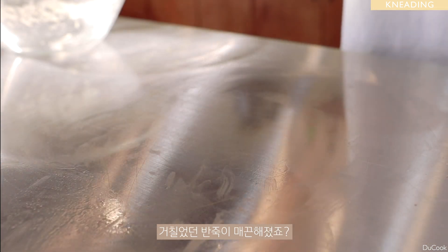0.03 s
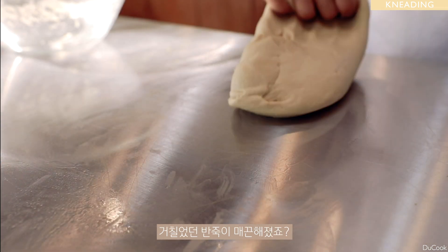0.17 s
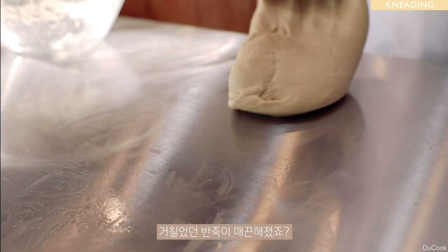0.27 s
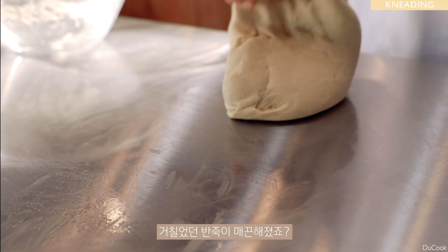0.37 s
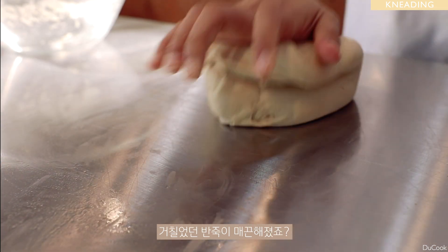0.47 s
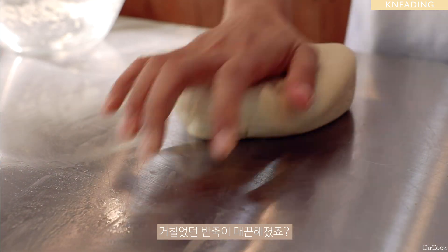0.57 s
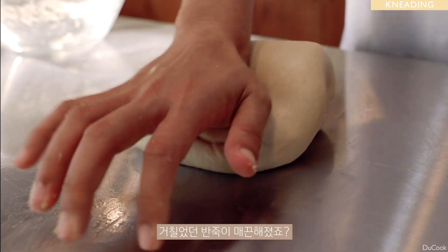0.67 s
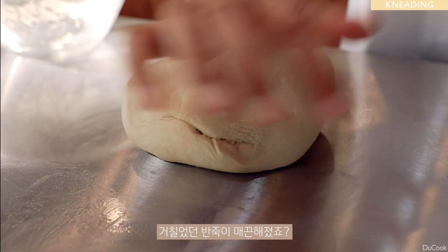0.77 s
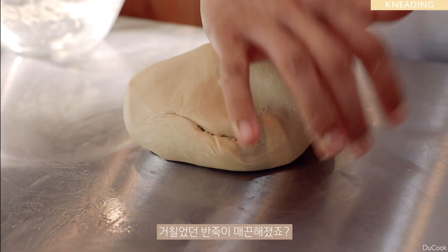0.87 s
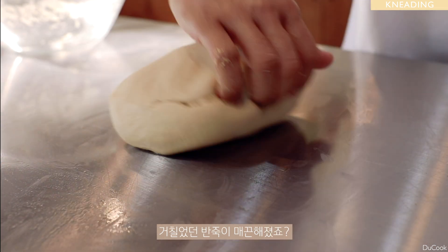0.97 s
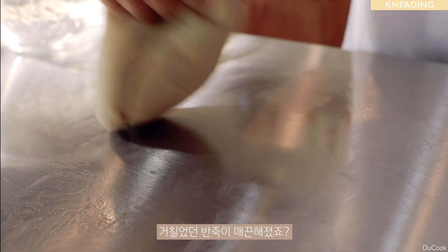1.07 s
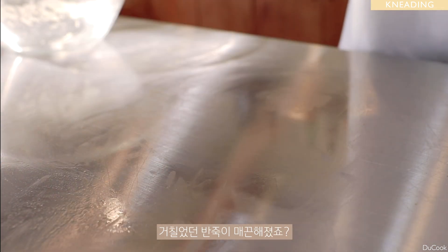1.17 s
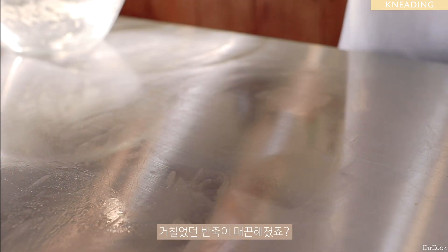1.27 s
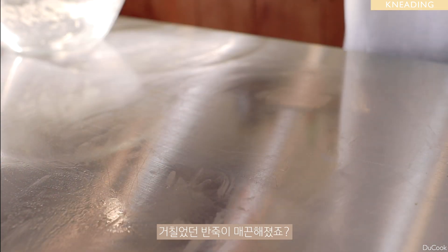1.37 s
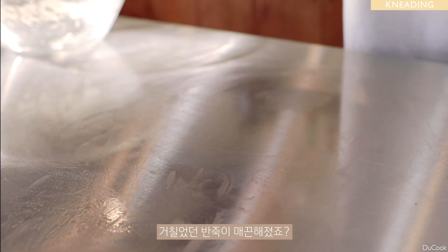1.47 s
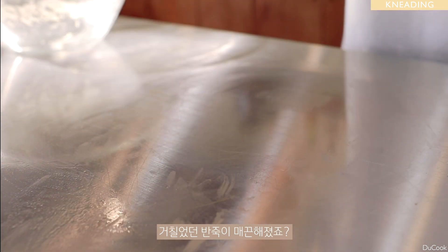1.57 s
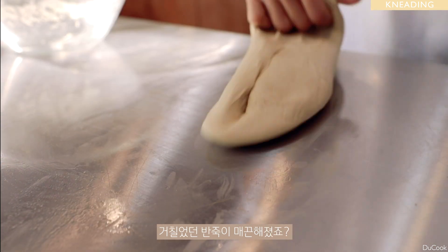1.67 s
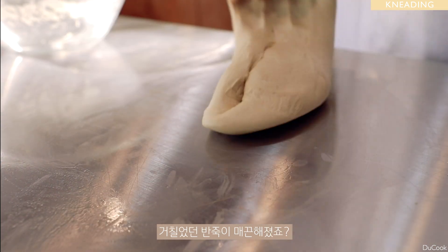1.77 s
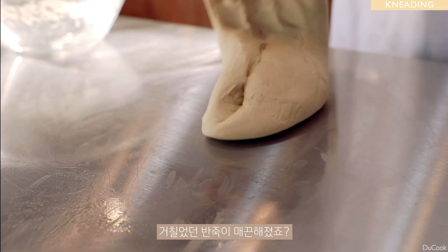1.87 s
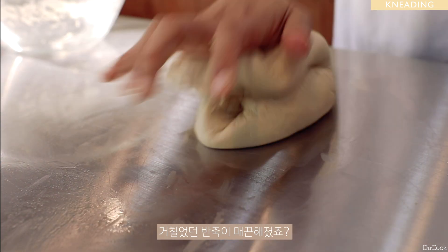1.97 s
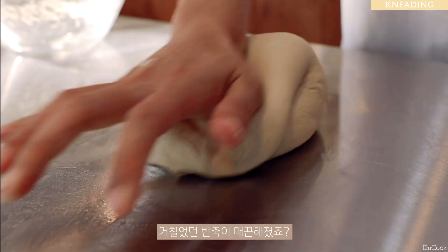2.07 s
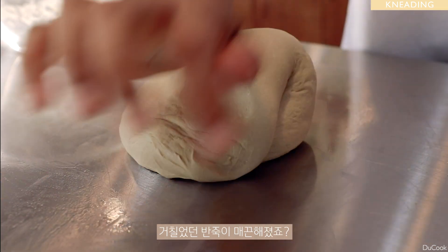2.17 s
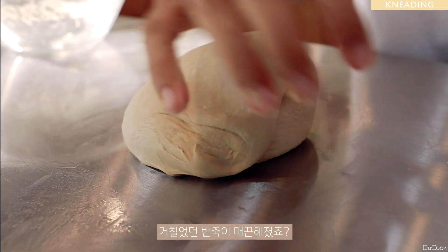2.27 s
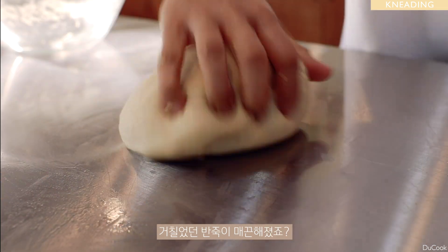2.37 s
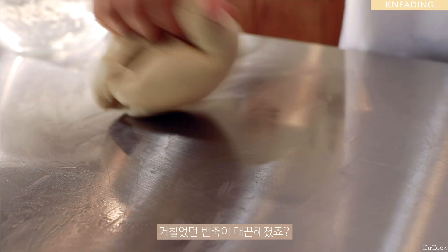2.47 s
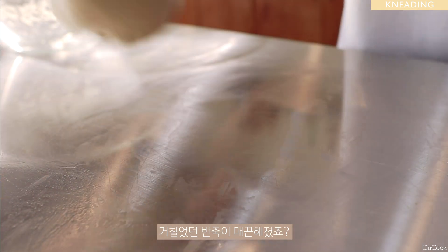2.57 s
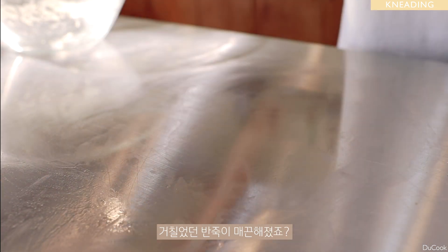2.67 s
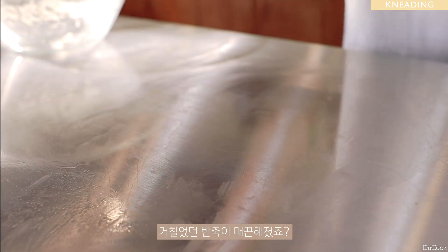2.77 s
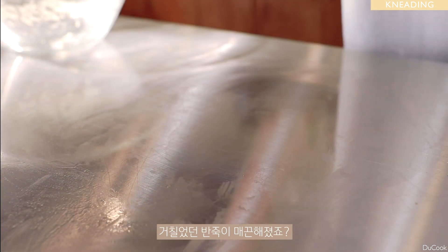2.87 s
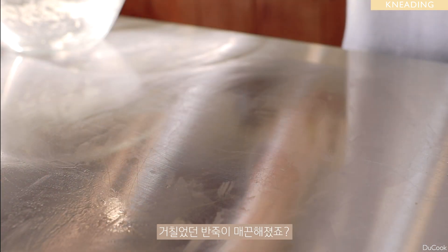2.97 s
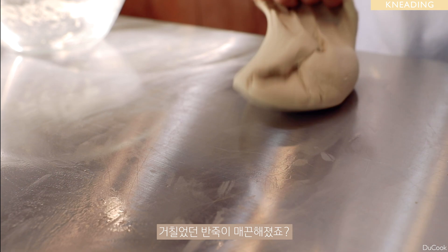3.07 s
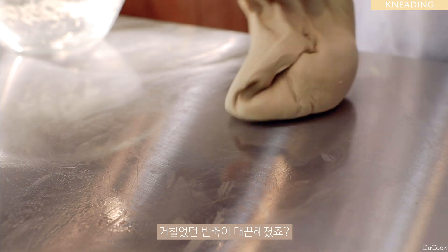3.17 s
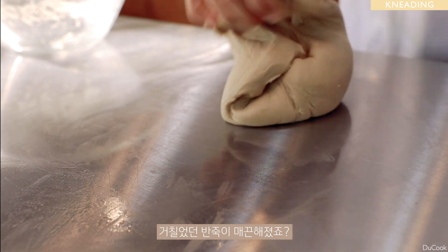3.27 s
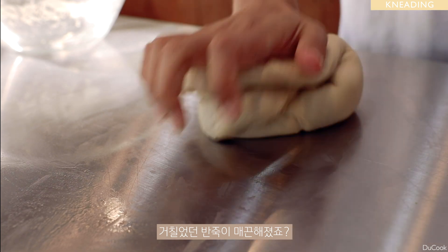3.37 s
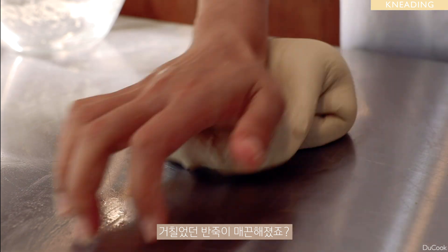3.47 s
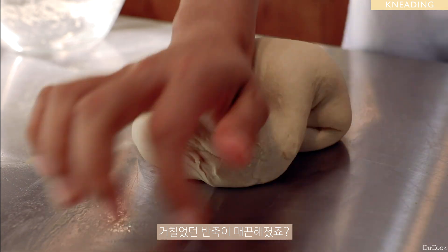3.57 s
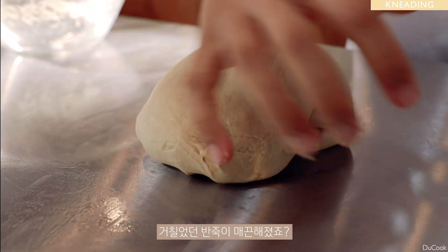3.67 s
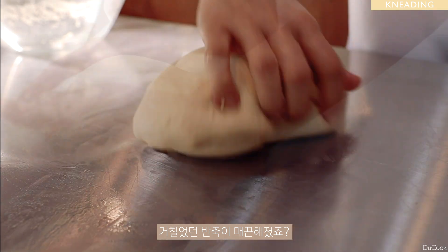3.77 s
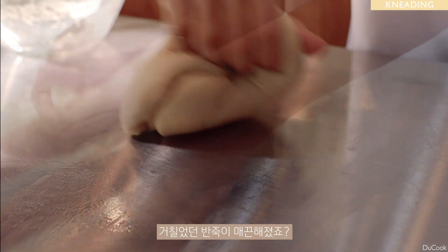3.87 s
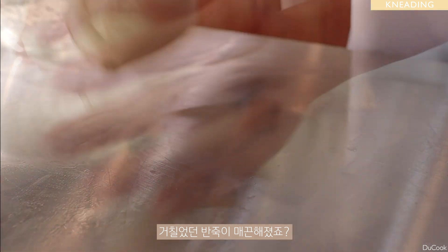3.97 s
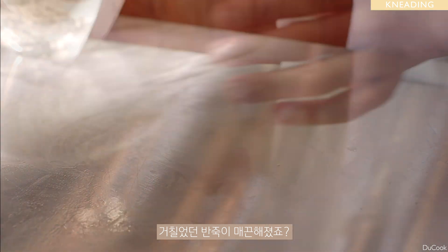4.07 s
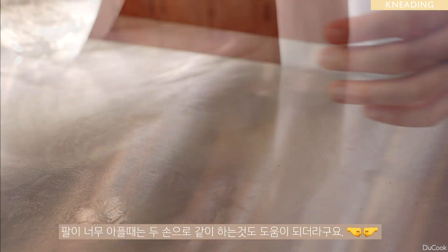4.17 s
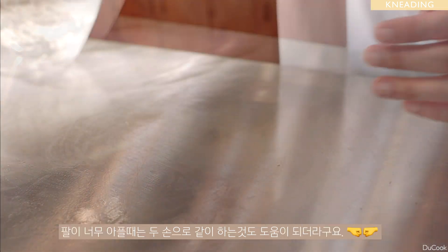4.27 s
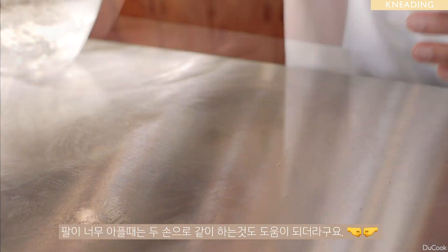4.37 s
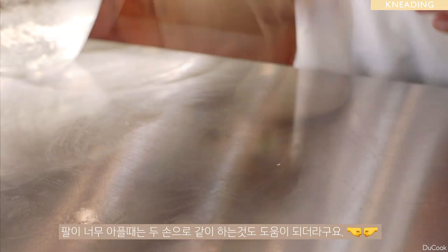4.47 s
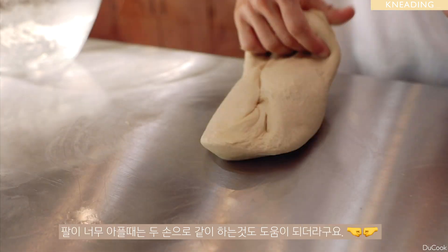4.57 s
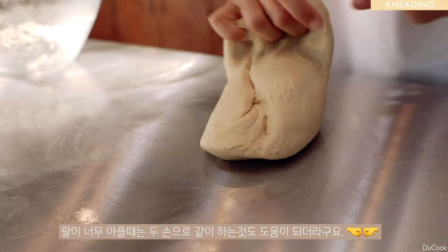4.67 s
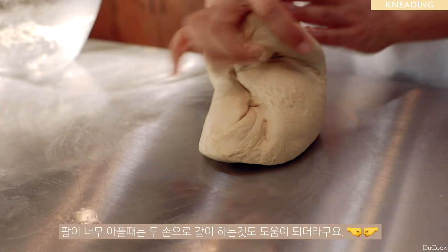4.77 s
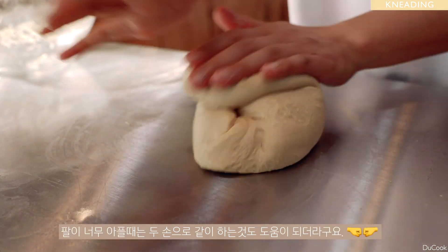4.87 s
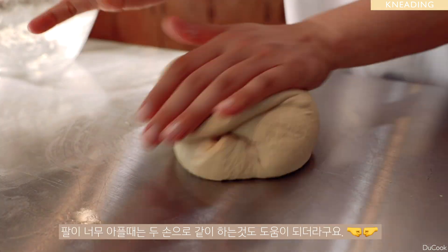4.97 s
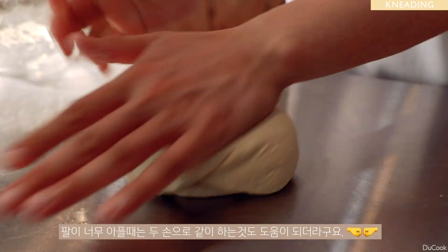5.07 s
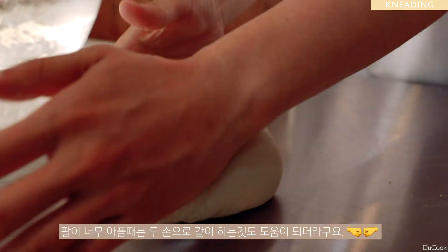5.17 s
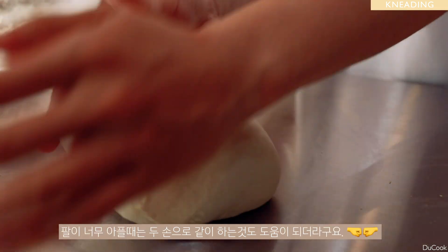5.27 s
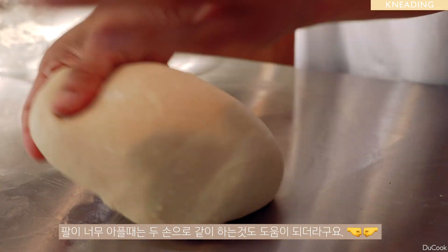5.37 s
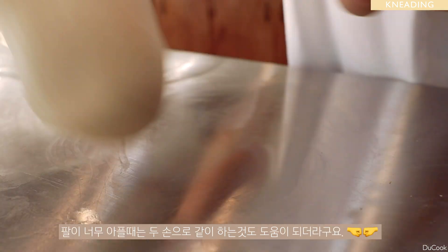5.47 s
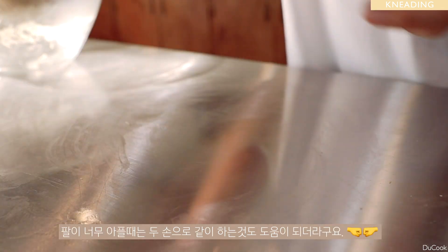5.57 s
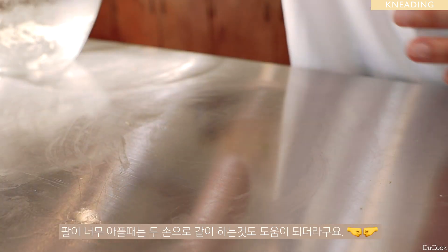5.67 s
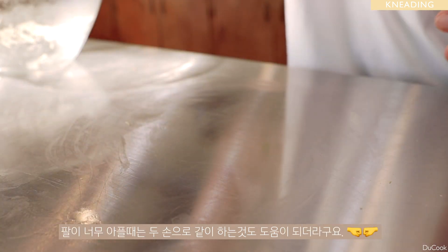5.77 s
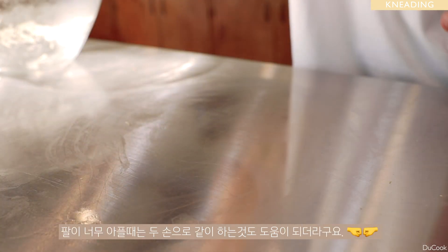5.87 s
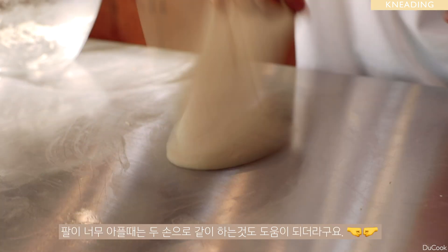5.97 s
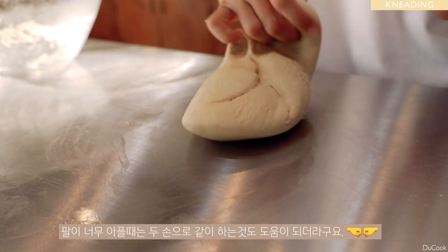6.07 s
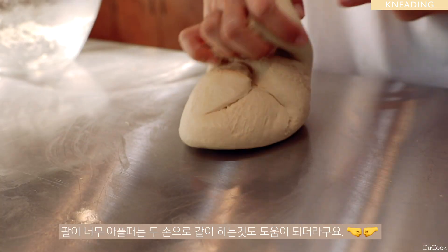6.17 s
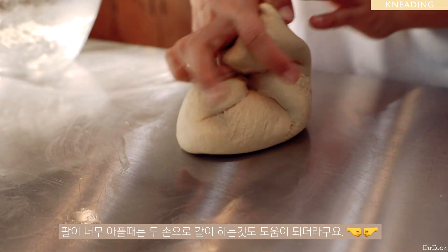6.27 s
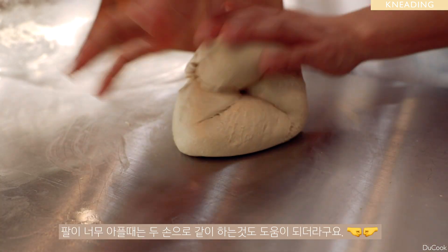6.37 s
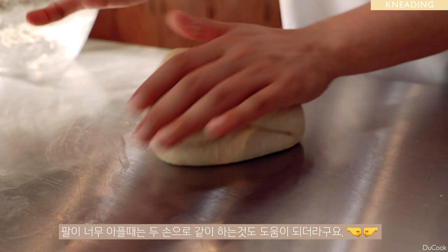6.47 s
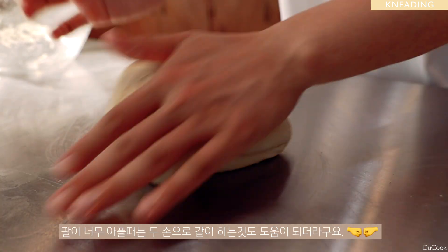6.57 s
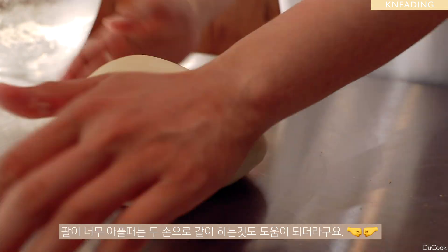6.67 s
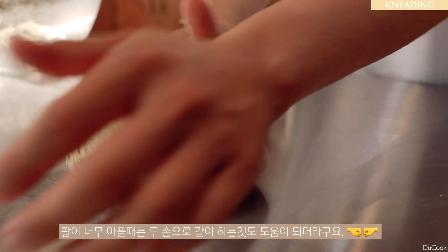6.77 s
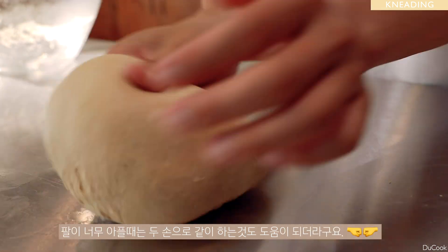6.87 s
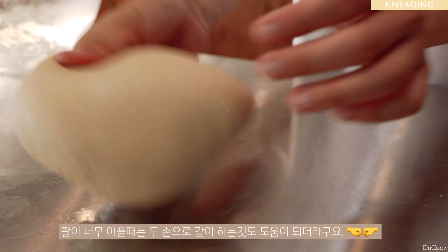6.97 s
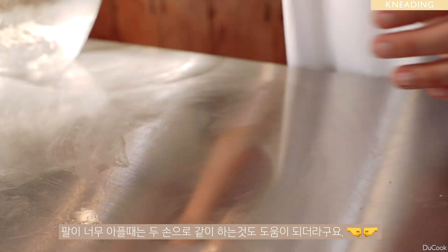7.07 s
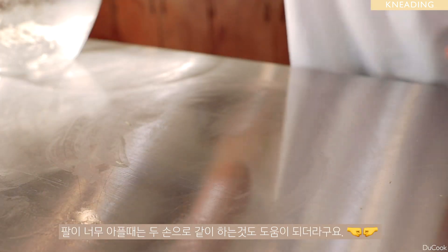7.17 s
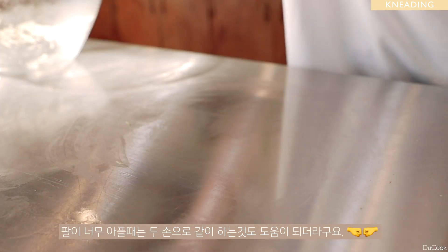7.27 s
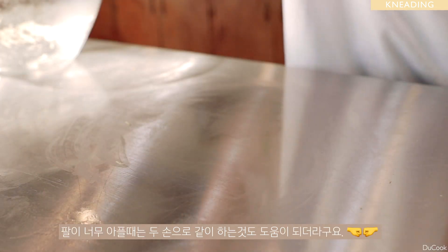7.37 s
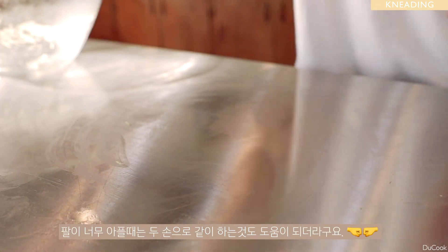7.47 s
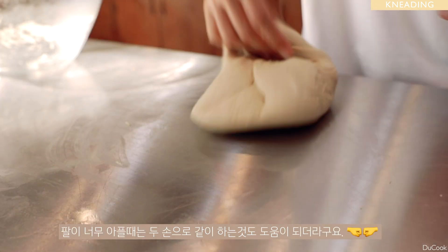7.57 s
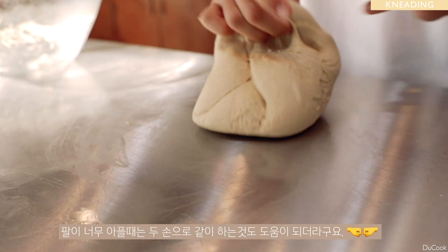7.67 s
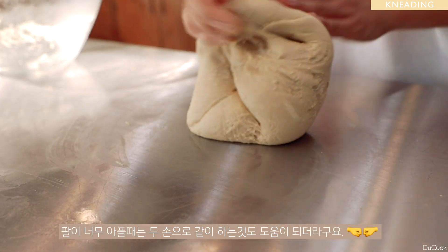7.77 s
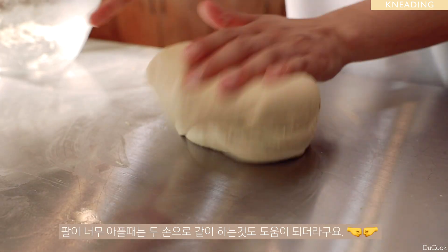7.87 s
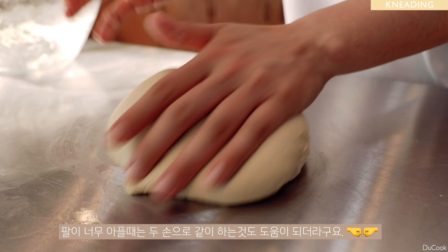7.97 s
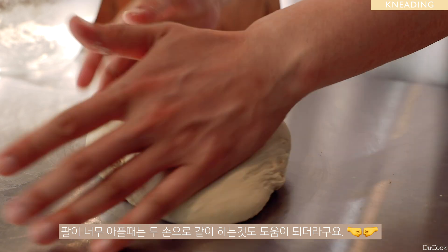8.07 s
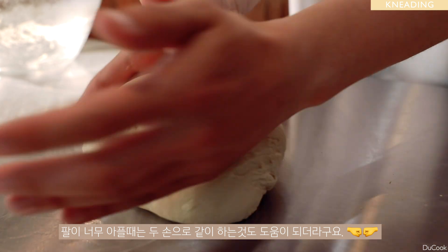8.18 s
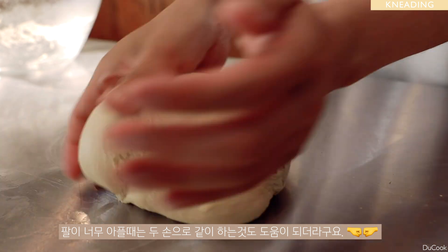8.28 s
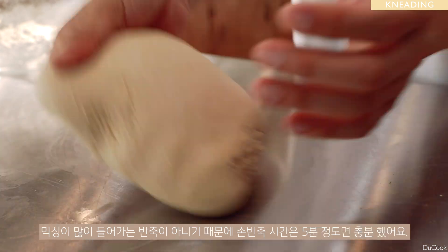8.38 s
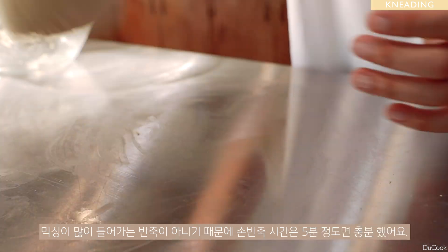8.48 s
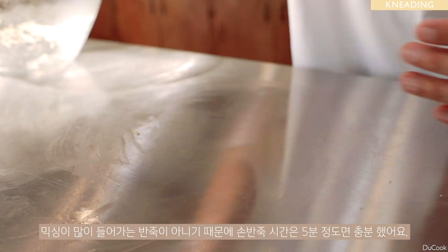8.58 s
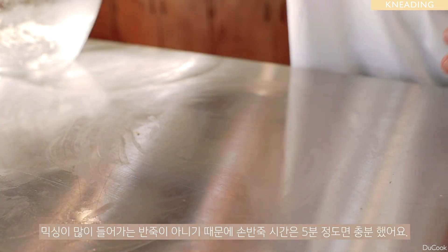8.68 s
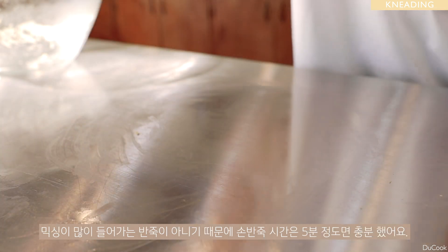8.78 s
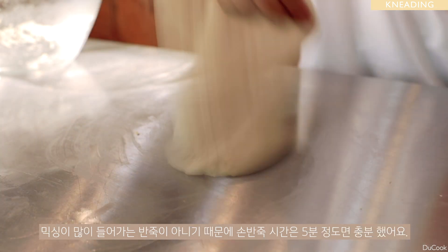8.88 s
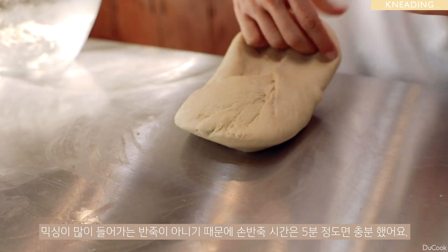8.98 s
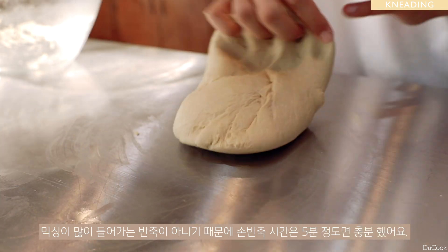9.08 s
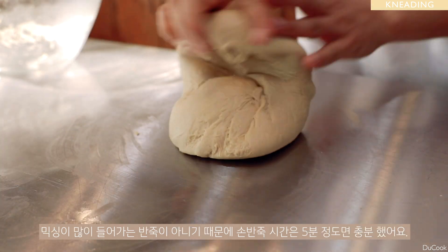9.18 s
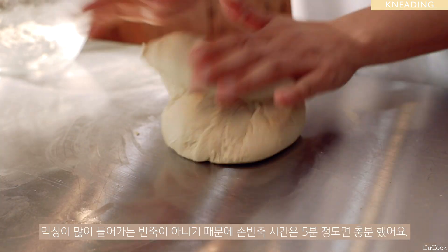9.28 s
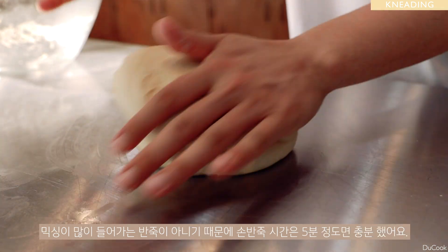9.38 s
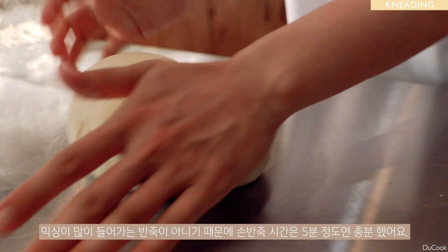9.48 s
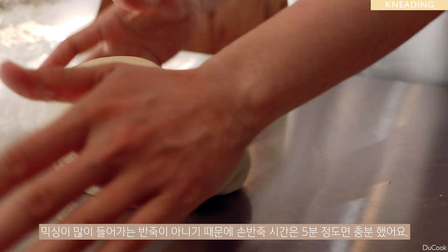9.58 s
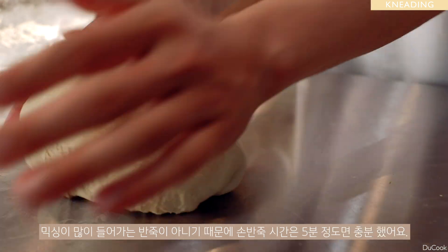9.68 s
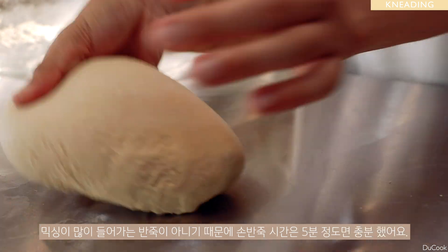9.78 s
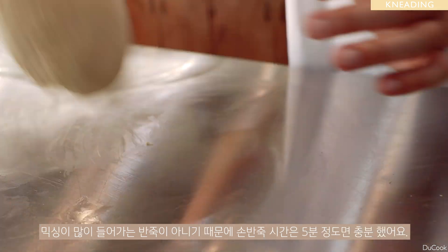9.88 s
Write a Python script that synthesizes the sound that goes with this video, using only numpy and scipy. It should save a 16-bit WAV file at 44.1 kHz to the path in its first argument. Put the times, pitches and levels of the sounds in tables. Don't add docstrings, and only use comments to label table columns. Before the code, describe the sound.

A ball of soft dough is slammed seven times onto a booming, rattling steel bench, with sticky folding, pats and snaps between blows.

```python
import sys
import numpy as np
from scipy import signal
from scipy.fft import rfft, irfft
from scipy.io import wavfile
from scipy.ndimage import uniform_filter1d, map_coordinates

SR = 44100
rng = np.random.default_rng(int(sys.argv[2]) if len(sys.argv) > 2 else 0)


def master(y):
    cut = np.clip(np.atleast_2d(y).T, -1, 1)
    pcm = np.round(cut * 32767)
    wavfile.write(sys.argv[1], SR, pcm.astype(np.int16))


def natural_amplitude(level_db):
    exponent = np.asarray(level_db, float) / 20
    return 10 ** exponent


N = 438354

# start_s, blow_db, second_mode_db, upper_modes_db, rattle_db (sheet and room)
SLAM_EVENTS = [
    (.227, 4.5, -2.5, -11, -17),
    (1.736, 21.5, 3, -1, -15),
    (3.1238, 9, -11.5, -6, -19),
    (4.5923, 16.5, 9, -1.5, -7.5),
    (6.064, 9.5, 6, -2, -7.5),
    (7.618, 2, -0.5, -2.5, -12.5),
    (8.9930, 6.5, 7.5, -5.5, -9.5),
]
# freq_hz, level_db (per Hz)
DOUGH_SPECTRUM = [(60, -70), (130, -7.5), (300, 2.5), (600, -2.5), (1300, -16), (3000, -35.5), (8000, -78)]


def unit(x):
    return x / np.sqrt(np.mean(x ** 2) + 1e-20)


def along(points, hz):
    f, v = np.transpose(points)
    return np.interp(np.log(hz + 1), np.log(f + 1), v)


def curves(rows):
    s, *cols = np.transpose(rows)
    return [np.interp(np.arange(N) / SR, s, c) for c in cols]


def add(track, start_s, sound):
    part = track[round(start_s * SR):][:len(sound)]
    part += sound[:len(part)]


def noise(spectrum, size, patchy_db, t60=None):
    hz, t, z = signal.stft(rng.standard_normal(size), SR, nperseg=1024 if t60 is None else 512)
    field = uniform_filter1d(rng.standard_normal(z.shape), size=8, axis=0)
    field = uniform_filter1d(field, size=4, axis=1)
    z = z * natural_amplitude(along(spectrum, hz)[:, None] + patchy_db * unit(field))
    scale = np.std(signal.istft(z)[1])
    if t60 is not None:
        t60_s = np.clip(along(t60, hz), .05, 5)
        z = z * natural_amplitude(-60 * t / t60_s[:, None])
    return signal.istft(z)[1][:size] / scale


def burst(spectrum, t60_s, size):
    return natural_amplitude(-60 * np.arange(size) / SR / t60_s) * noise(spectrum, size, patchy_db=-0.5)


def clumps(size, step):
    chatter_db = 3
    knots = rng.exponential(size=size // step + 4)
    return unit(natural_amplitude(chatter_db * map_coordinates(knots, [np.arange(size) / step], order=1)))


def kitchen():
    # freq_hz, level_db (per Hz)
    hum_spectrum = [(15, -57), (25, -24), (84, -9), (102, 5.5), (255, -2.5), (392, -9.5), (425, -6),
                    (604, -12.5), (710, -8), (929, -15.5), (1060, -14), (3050, -27), (5230, -38),
                    (10800, -41), (15800, -43)]
    return natural_amplitude(-42.5) * noise(hum_spectrum, N, patchy_db=1.24)


def squeak():
    # start_s, pitch_hz, level_db
    palm_rub = [
        (8.44, 2040, -63),
        (8.46, 1953, -55),
        (8.528, 2090, -54),
        (8.56, 1830, -59),
    ]
    first_s, first_hz, _ = palm_rub[0]
    last_s, last_hz, _ = palm_rub[-1]
    hz, level_db = curves([(first_s - .02, first_hz, -90), *palm_rub, (last_s + .01, last_hz, -90)])
    turn = 2 * np.pi * np.cumsum(hz) / SR + .14 * np.cumsum(rng.standard_normal(N))
    return natural_amplitude(level_db + 6.5) * clumps(size=N, step=300) * (np.sin(turn) + 0.5 * np.sin(2 * turn))


def stroke(peak_s, db, swell_s, hold_s, fade_s):
    t = np.arange(0, N + 32, 32) / SR - peak_s
    rise = np.maximum(-t, 0) / max(swell_s, .003)
    fall = np.maximum(t - hold_s, 0) / max(fade_s, .003)
    return natural_amplitude(db - 10 * (rise + fall))


def handling():
    # let_go_s, level_db, swell_s (per 10 dB), dullness_db
    pulls = [(.832, -54, .25, 4.5), (2.234, -49, 0.14, -12), (3.41, -53, 0.12, -7), (3.69, -53, .06, -6),
             (4.926, -49.5, 0.16, -12), (5.512, -49.5, 0.023, 3), (6.78, -55, 0.3, 1),
             (7.052, -52.5, 0.15, 4.5), (8.48, -49.5, 0.081, 0), (9.903, -49.5, 0.068, 2)]
    # peak_s, level_db, swell_s (per 10 dB), fade_s (per 10 dB), dullness_db
    rubs = [(.528, -45.5, .03, 0.014, 4), (1.45, -60.5, 0.018, .07, 5), (2.024, -47, 0.045, 0.037, -18),
            (2.78, -71, .03, .15, 11), (3.58, -52, 0.12, 0.048, 2.5), (4.33, -61, 0.077, 0.041, 3),
            (4.943, -42, 0.0036, 0.007, -11), (5.83, -65.5, .2, .2, 4), (6.43, -51, 0.043, 0.023, -6),
            (6.68, -50.5, 0.04, 0.047, -3), (7.151, -57.5, 0.19, 0.028, 3.5),
            (7.93, -49, 0.0047, 0.0027, -1), (8.115, -53, 0.22, 0.12, 2), (8.555, -54, 0.31, 0.036, 1),
            (8.775, -61, 0.091, 0.037, 0), (9.32, -42, 0.042, 0.014, -16), (9.635, -58.5, 0.35, 0.06, 1)]
    # start_s, length_s, level_db, dullness_db
    holds = [(0.978, 0.21, -49, 1), (2.428, 0.17, -49, -1), (3.827, .19, -49, 2), (4.016, 0.046, -60.5, 9),
             (4.986, 0.52, -59.5, 4.5), (5.52, .15, -71, 8), (6.421, 0.049, -47.5, 5.5),
             (7.274, 0.24, -66.5, 5), (8.219, 0.11, -60.5, 6), (9.333, 0.015, -41, -6),
             (9.364, 0.46, -61, 7.5)]
    let_go_s = 0.0056
    strokes = [(stroke(s, db, swell, 0, let_go_s), dull_db) for s, db, swell, dull_db in pulls]
    strokes += [(stroke(s, db, swell, 0, fade), dull_db) for s, db, swell, fade, dull_db in rubs]
    strokes += [(stroke(s, db, let_go_s, hold, let_go_s), dull_db) for s, hold, db, dull_db in holds]
    strokes += [(stroke(s, -50.5, 0.032, 0, let_go_s), 5.5) for s, *_ in SLAM_EVENTS]
    fizz = sum(gain ** 2 for gain, _ in strokes)
    drag = sum((gain * natural_amplitude(dull_db)) ** 2 for gain, dull_db in strokes)
    return np.sqrt([fizz, drag]).repeat(32, axis=1)[:, :N]


def peel():
    # freq_hz, level_db (per Hz)
    fizz_spectrum = [(1500, -46), (3000, 4.5), (5000, 0.5), (8000, 1), (12000, 1.5), (15400, -2.5),
                     (16200, -33)]
    drag_spectrum = [(300, 12), (1000, 4), (2500, 4.5), (4000, 4), (4800, -61), (8000, -36)]
    fizz_gain, drag_gain = handling()
    grain_db = 4 * uniform_filter1d(rng.exponential(size=N // 40 + 1), size=2)
    grains = natural_amplitude(grain_db).repeat(40)[:N]
    fizz = unit(noise(fizz_spectrum, N, patchy_db=.6) * (1 + .15 * grains))
    drag = noise(drag_spectrum, N, patchy_db=1)
    return natural_amplitude(2.5) * (fizz_gain * fizz + drag_gain * drag)


def pops(rows, t60_s, narrow):
    out, t = np.zeros(N), np.arange(1024) / SR
    f = np.fft.rfftfreq(len(t), 1 / SR) + 1
    shape = natural_amplitude(-60 * t / max(t60_s, .003)) * (1 - np.exp(-t / 0.0012))
    for s, pop_db, pop_hz, spit_db in rows:
        white = rfft(rng.standard_normal((2, len(t))))
        pop = unit(irfft(white[0] / (1 + (narrow * np.log2(f / pop_hz)) ** 2)))
        spit = unit(irfft(white[1] / (1 + (6000 / f) ** 4) * (f < 15900)))
        add(out, s, shape * (natural_amplitude(pop_db) * pop + natural_amplitude(spit_db + 5.5) * spit))
    return out


def snaps():
    # start_s, pop_db, pop_hz, spit_db
    finger_snaps = [(0.0634, -41, 1950, -47), (0.188, -34, 3330, -48), (0.4434, -26, 1900, -46),
                    (0.8011, -27, 3200, -51), (1.0164, -43, 2500, -35), (1.0964, -43, 2870, -34.5),
                    (1.6786, -36, 2620, -51), (2.0218, -22, 1760, -37), (2.1444, -36, 1950, -40),
                    (2.2233, -37, 3450, -42), (2.3754, -48, 2890, -49), (2.5431, -32.5, 2980, -31),
                    (3.6576, -27.5, 3360, -48), (3.9084, -33, 2050, -36), (3.931, -35, 2410, -36),
                    (5.229, -25, 1100, -54), (5.2465, -27, 1820, -53), (5.3906, -29.5, 2640, -60),
                    (5.4181, -33, 4740, -60), (6.765, -39, 3080, -43), (6.8633, -27, 2560, -50),
                    (6.9701, -37, 3050, -54), (7.0454, -28.5, 3040, -42), (7.8744, -23, 1890, -43),
                    (8.1728, -30, 2770, -50), (8.3429, -35, 2040, -48), (8.3664, -33, 2050, -60),
                    (9.631, -27, 1830, -42), (9.848, -34, 2240, -45), (9.8844, -38, 3240, -39)]
    return pops(finger_snaps, t60_s=0.017, narrow=1.64)


def rip_offs():
    # start_s, pop_db, pop_hz, spit_db
    tear_cracks = [
        (0.9780, -6, 1100, -23),
        (0.9844, -39, 1870, -26),
        (0.9908, -19.5, 3100, -42),
        (2.4272, -17.5, 1600, -17),
        (2.4313, -19, 3130, -29),
        (2.4345, -18, 1990, -43),
        (3.823, -33, 3270, -22),
        (3.8257, -5.5, 1900, -26),
        (3.8385, -8.5, 1100, -40),
    ]
    return pops(tear_cracks, t60_s=0.011, narrow=1.0)


def push(t, hz, cycles):
    u = t * hz / cycles
    return -np.sin(2 * np.pi * hz * t) * u * np.exp(1 - u)


def boom(t, deep_db, second_db, upper_db, damp):
    # freq_hz, t60_s, level_db
    modes = [
        (47.7, 0.37, -1),
        (78.15, 0.28, 2),
        (119, 0.64, -4.5),
        (126.04, 0.78, -12),
        (140.9, 0.28, -5.5),
        (187.4, 0.71, -12.5),
        (199, 0.25, -7),
        (215, 0.9, -19),
    ]
    scatter = rng.standard_normal((len(modes), 2))
    waver = .011 * np.cumsum(rng.standard_normal((len(modes), len(t))), axis=1)
    scatter[:2], waver[0] = 0, 0
    levels_db = np.array([deep_db, second_db] + [upper_db] * (len(modes) - 2)) + 3.47 * scatter[:, 0]
    phases = scatter[:, 1:] + waver
    ring = np.zeros(len(t))
    for drive_db, phase, (hz, t60_s, db) in zip(levels_db, phases, modes):
        decay = natural_amplitude(drive_db + db - 60 * t / (damp * t60_s))
        ring += decay * np.cos(2 * np.pi * hz * t + phase)
    return ring * (1 - np.exp(-t / 0.0056))


def pats():
    # start_s, push_db, push_hz, deep_mode_db, higher_modes_db
    pat_events = [(0.689, -49, 100, -42, -45), (6.765, -32.5, 141, -50.5, -53),
                  (0.9776, -10.5, 238, -28, -22), (2.003, -23, 147, -44, -27),
                  (2.065, -31.5, 142, -45, -33), (2.4295, -25, 100, -24.5, -34),
                  (3.613, -36, 143, -46, -45), (3.695, -36.5, 159, -57, -49), (3.8386, -13, 215, -30, -25),
                  (5.2282, -28, 164, -52, -33), (5.246, -29, 157, -55, -40), (5.311, -39, 143, -37, -46),
                  (5.528, -45, 191, -64, -47), (6.751, -33, 149, -49, -43),
                  (6.7594, -32, 168, -38.5, -32.5), (6.8656, -30, 138, -32.5, -33),
                  (6.97, -52, 132, -56, -35.5), (8.097, -41, 108, -42, -34), (8.1726, -28, 215, -56, -38),
                  (8.263, -34.5, 109, -35, -36.5), (8.352, -36, 100, -47, -55), (8.465, -48, 102, -46, -43),
                  (9.63, -31, 142, -49, -37), (9.718, -42, 228, -40, -41)]
    out, t = np.zeros(N), np.arange(round(.45 * SR)) / SR
    for s, db, hz, deep_db, upper_db in pat_events:
        add(out, s, natural_amplitude(db + 5.5) * push(t, hz, cycles=0.48))
        add(out, s, natural_amplitude(db - 3) * burst(DOUGH_SPECTRUM, t60_s=0.053, size=4096))
        add(out, s, natural_amplitude(10) * boom(t, deep_db, upper_db - 6, upper_db - 9, damp=0.88))
    return out


def slams(rows):
    # freq_hz, level_db (per Hz)
    slap_spectrum = [(100, -28), (500, 1), (1200, 6.5), (3500, -4.5), (8000, -14.5), (16000, -13)]
    spray_spectrum = [(1500, -28), (3000, -0.5), (5000, 17.5), (8000, -19), (12000, -3), (16000, -10)]
    rattle_spectrum = [(35, -5.5), (60, -9), (118, 1.5), (149, -4.5), (189, 5), (287, -31), (354, -7.5),
                       (553, -6.5), (1700, -15), (3580, -14), (5590, -31), (13600, -24.5), (16000, -42)]
    # freq_hz, t60_s
    room_t60 = [(100, 1.14), (300, 0.94), (1000, 1.235), (3000, 0.92), (6000, 0.76), (14000, 0.28)]
    out, t = np.zeros(N), np.arange(round(1.2 * SR)) / SR
    size = 24576
    for s, blow_db, second_db, upper_db, rattle_db in rows:
        wash = noise(rattle_spectrum, len(t), patchy_db=0, t60=room_t60)
        wash *= (0.72 + 0.35 * clumps(size=len(t), step=400)) * (1 - np.exp(-t / 0.0065))
        slap = burst(slap_spectrum, t60_s=0.016, size=4096)
        body = burst(DOUGH_SPECTRUM, t60_s=0.48, size=size) * (1 - np.exp(-t[:size] / .004))
        spray = burst(spray_spectrum, t60_s=0.87, size=size) * clumps(size=size, step=130)
        bench = boom(t, 3.5, second_db, upper_db, damp=0.97)
        swing = 1 + 0.77 * np.exp(-t / 0.097)
        add(out, s + .001, natural_amplitude(blow_db + 7) * slap)
        add(out, s, natural_amplitude(upper_db - 6.5) * body)
        add(out, s, natural_amplitude(blow_db + 5) * push(t, hz=161.9, cycles=0.48))
        add(out, s, natural_amplitude(rattle_db - 27) * spray)
        add(out, s, swing * (natural_amplitude(-1) * bench + natural_amplitude(rattle_db - 3.5) * wash))
    return out


def microphone(x):
    excess = x - np.clip(x, -.75, .75)
    keep = np.exp(-1 / (0.00563 * SR))
    left = x + 7 * signal.lfilter([1 - keep], [1, -keep], excess)
    pair = np.array([left, natural_amplitude(-9.6) * x])
    return pair / (1 + np.abs(pair / .19) ** 12) ** (1 / 12)


def scene():
    # start_s, blow_db, second_mode_db, upper_modes_db, rattle_db
    earlier_slam = [
        (4.5522, 9, 0, -1.5, -9),
    ]
    # time_s, gain_db
    outgoing_fade = [
        (4.5, -28),
        (4.56, -14),
        (4.62, -23),
        (4.7, -11),
        (4.76, -60),
    ]
    main = kitchen() + squeak() + peel() + snaps() + rip_offs() + pats() + slams(SLAM_EVENTS)
    return microphone(main) + natural_amplitude(curves(outgoing_fade)[0]) * microphone(slams(earlier_slam))


def roll_off(x):
    return signal.sosfilt(signal.butter(12, 17070, fs=SR, output="sos"), x)


def record(dry):
    limit = signal.firwin(255, 16500, fs=SR)
    hissing = dry + natural_amplitude(-92) * rng.standard_normal(dry.shape)
    mix = signal.fftconvolve(hissing, limit[None], "same", axes=1)
    return roll_off(mix)


dry = scene()
out = record(dry)
master(out)
```